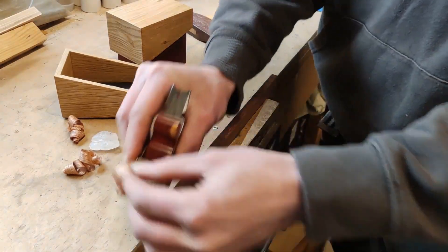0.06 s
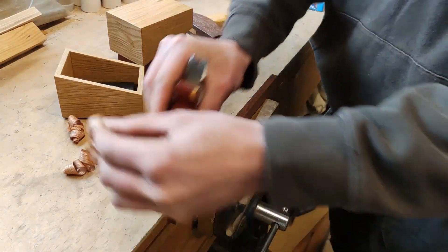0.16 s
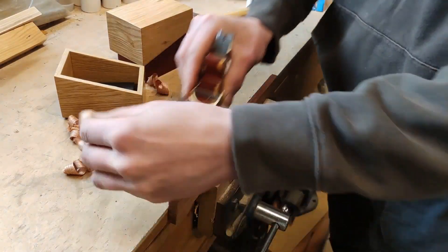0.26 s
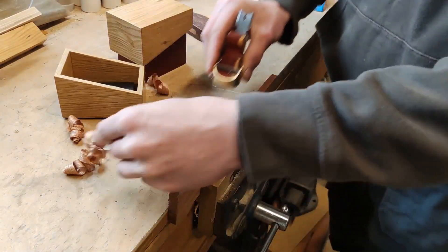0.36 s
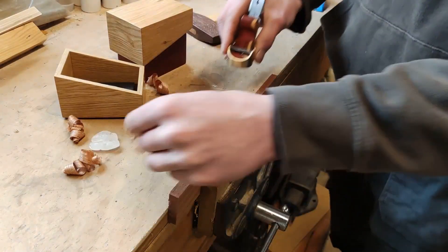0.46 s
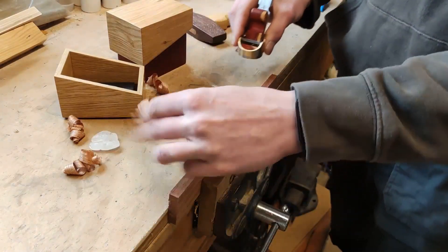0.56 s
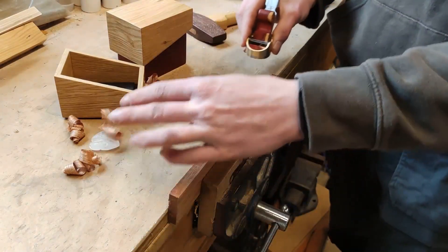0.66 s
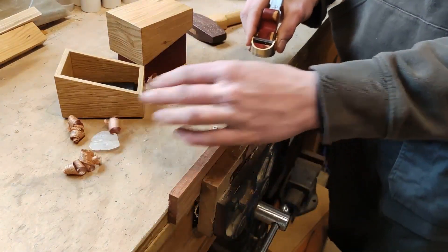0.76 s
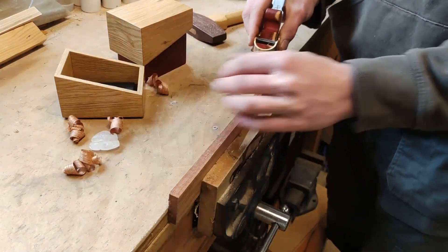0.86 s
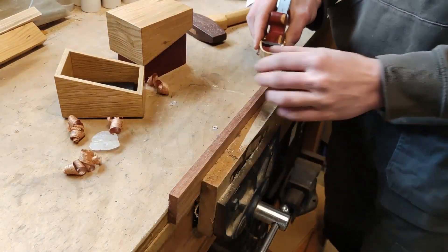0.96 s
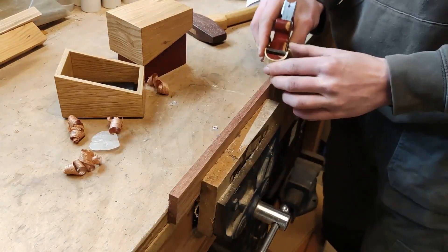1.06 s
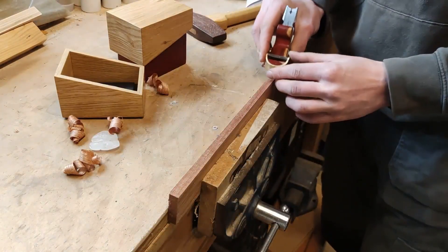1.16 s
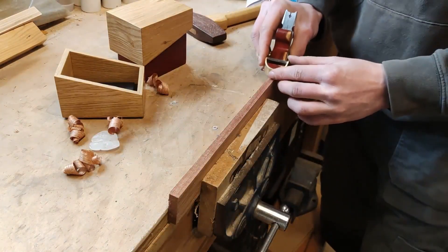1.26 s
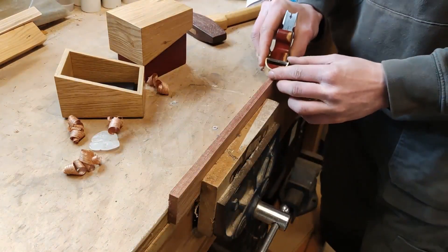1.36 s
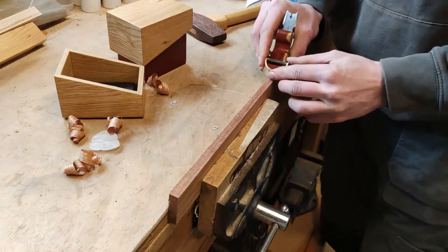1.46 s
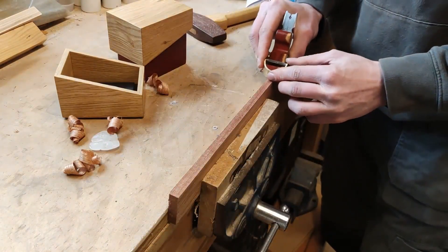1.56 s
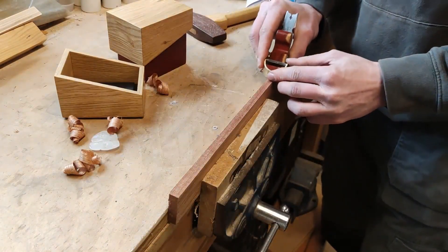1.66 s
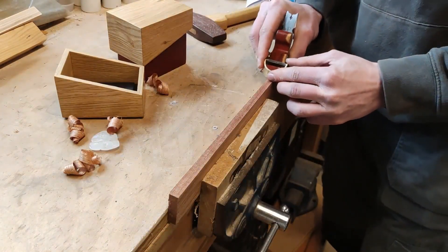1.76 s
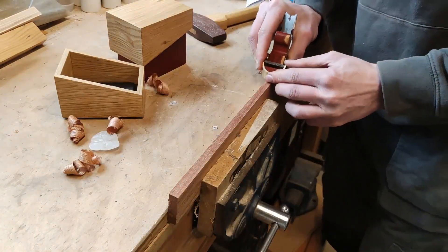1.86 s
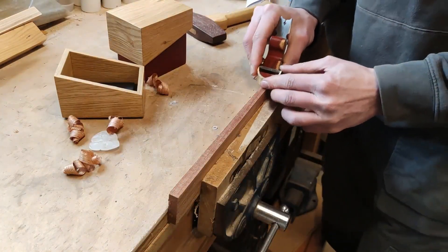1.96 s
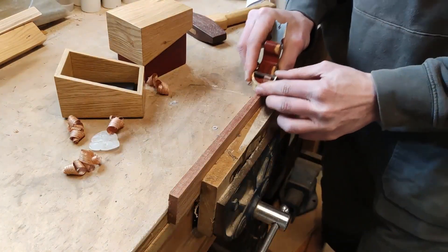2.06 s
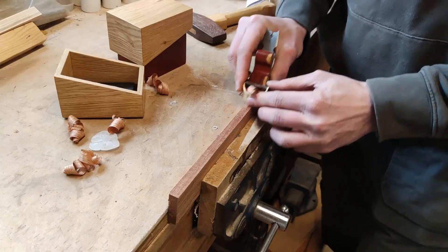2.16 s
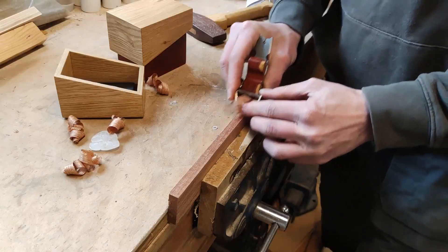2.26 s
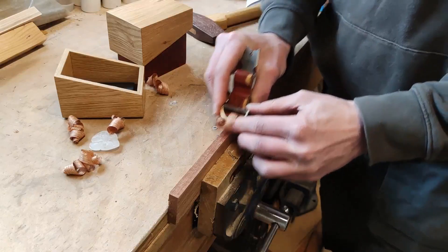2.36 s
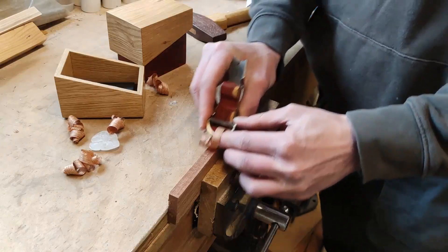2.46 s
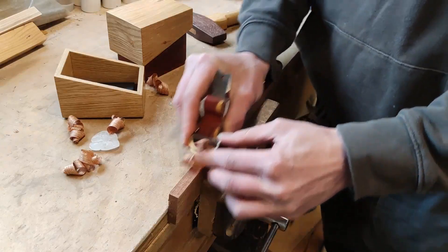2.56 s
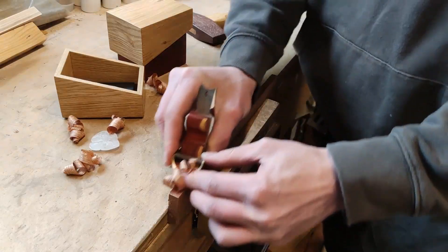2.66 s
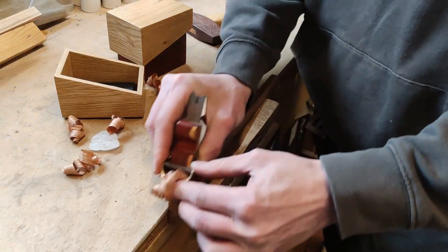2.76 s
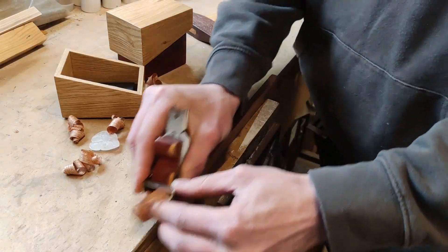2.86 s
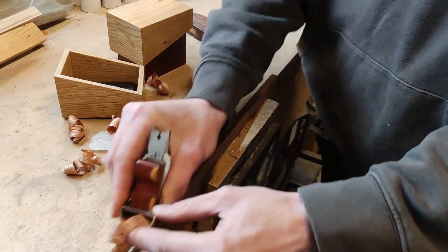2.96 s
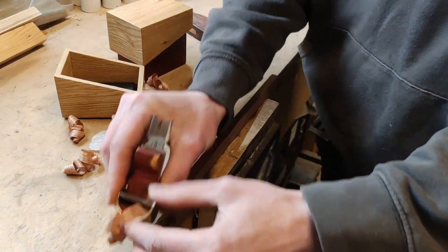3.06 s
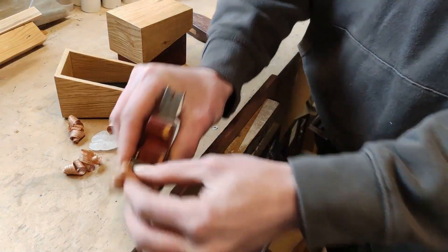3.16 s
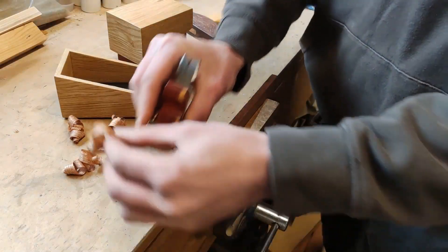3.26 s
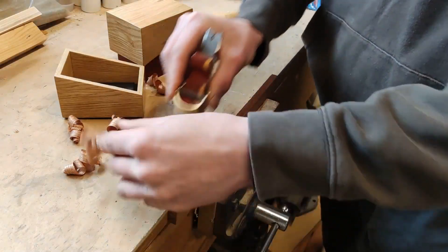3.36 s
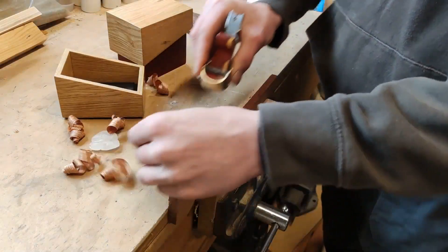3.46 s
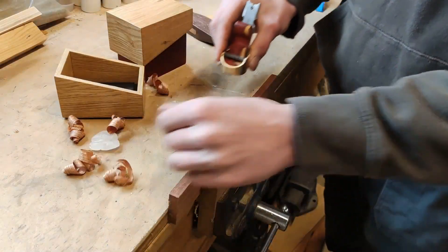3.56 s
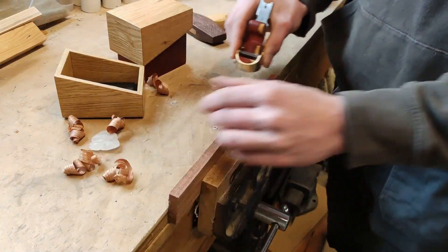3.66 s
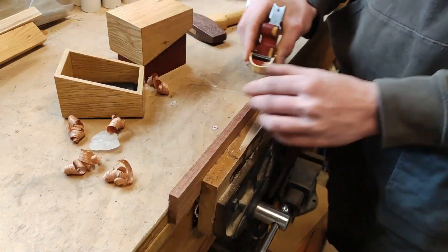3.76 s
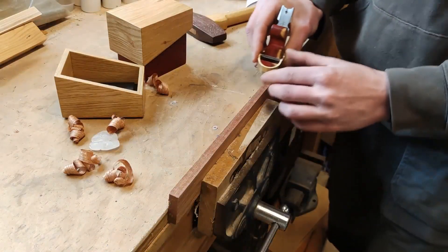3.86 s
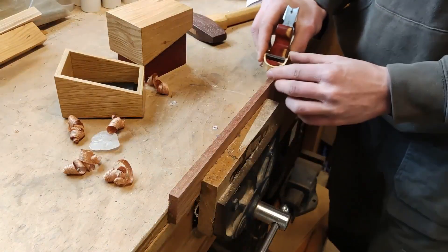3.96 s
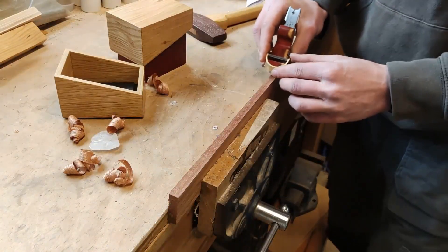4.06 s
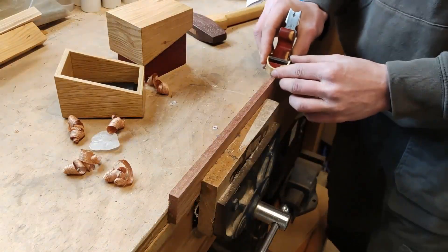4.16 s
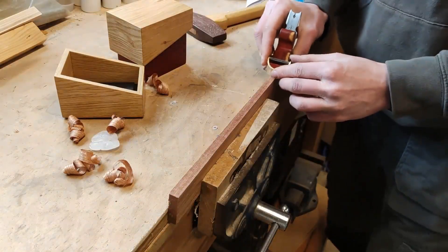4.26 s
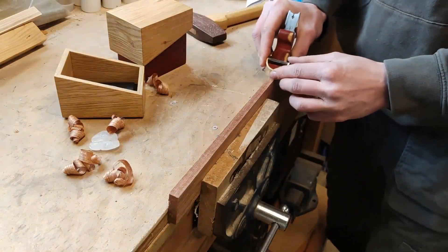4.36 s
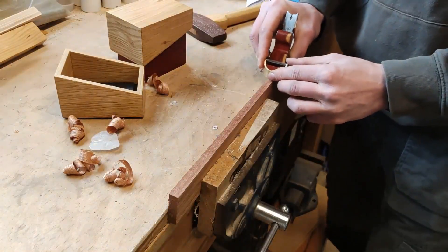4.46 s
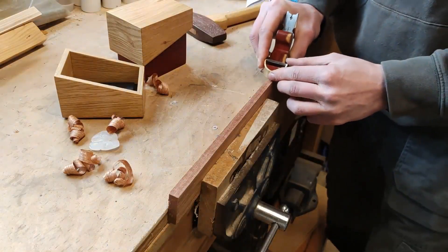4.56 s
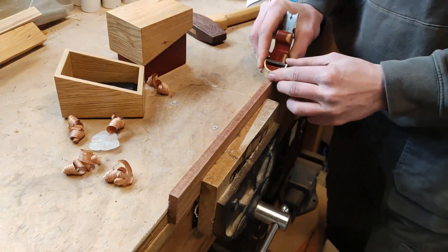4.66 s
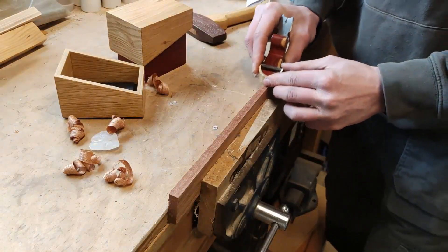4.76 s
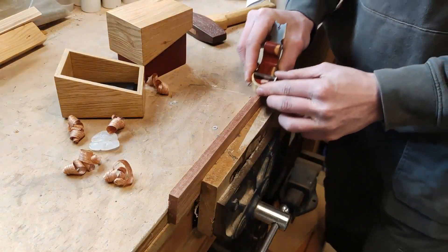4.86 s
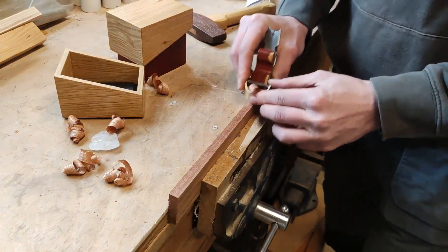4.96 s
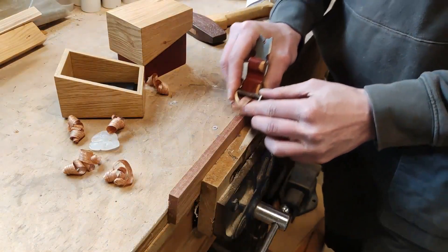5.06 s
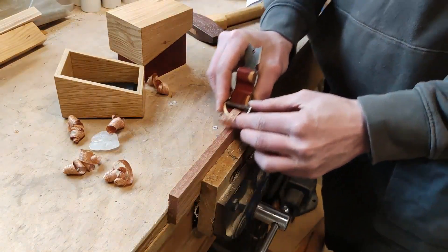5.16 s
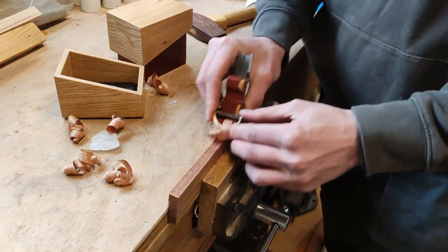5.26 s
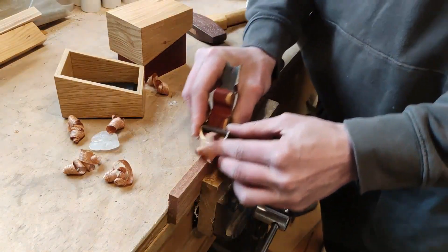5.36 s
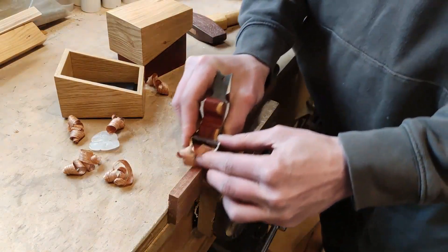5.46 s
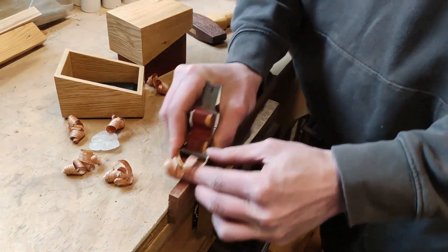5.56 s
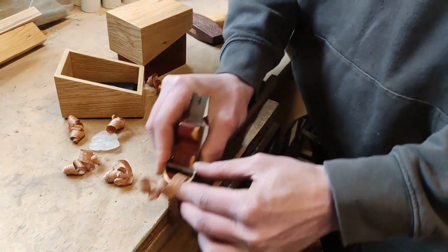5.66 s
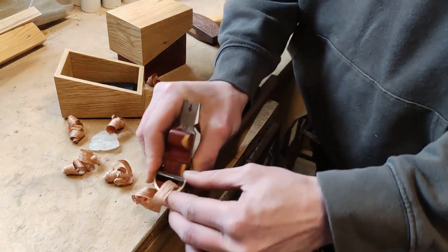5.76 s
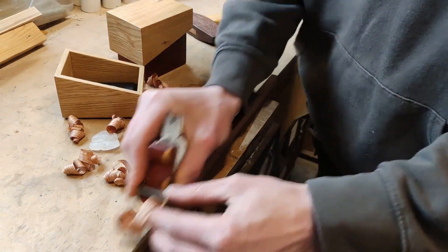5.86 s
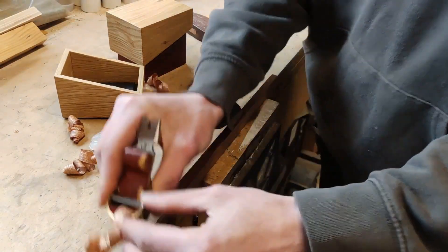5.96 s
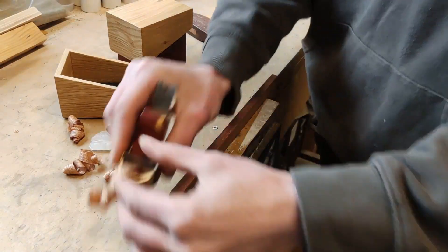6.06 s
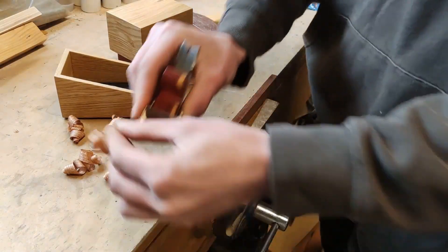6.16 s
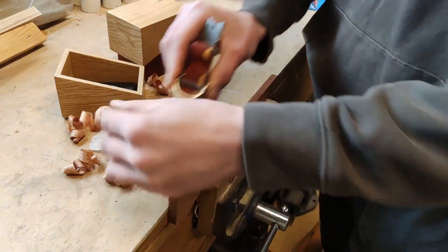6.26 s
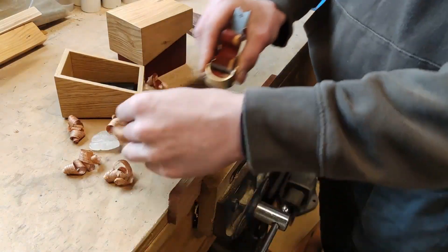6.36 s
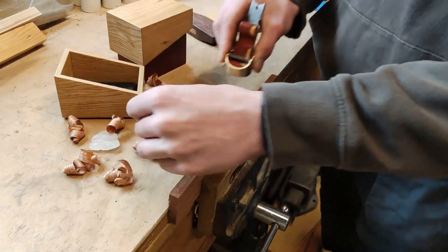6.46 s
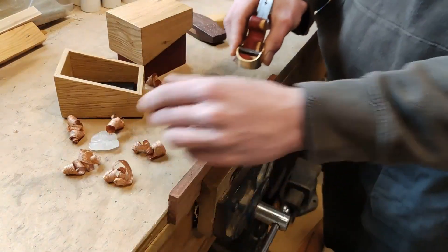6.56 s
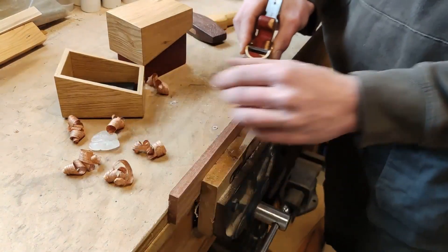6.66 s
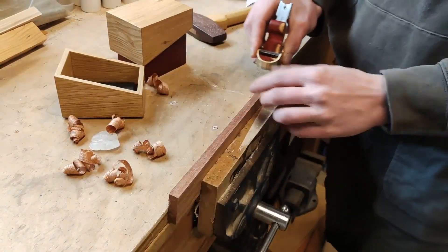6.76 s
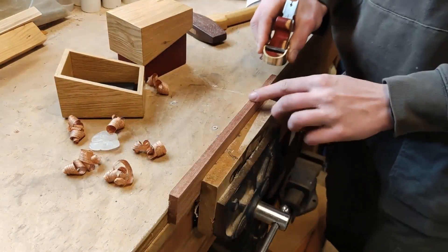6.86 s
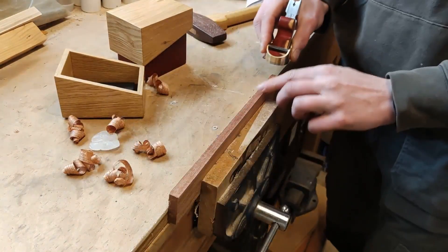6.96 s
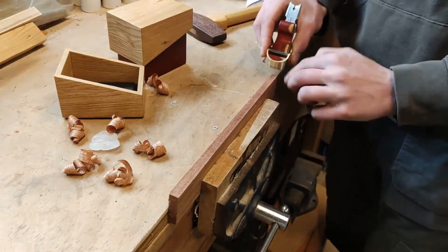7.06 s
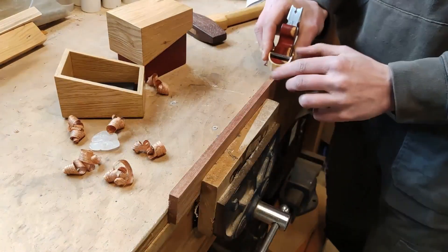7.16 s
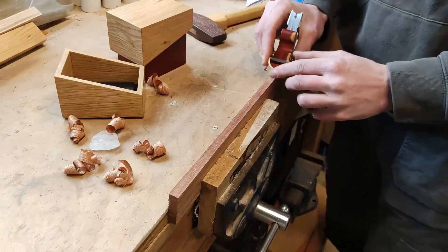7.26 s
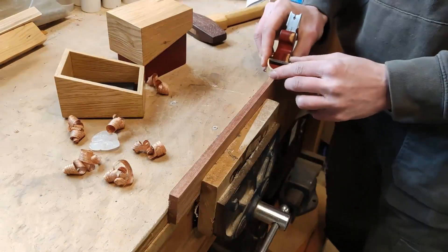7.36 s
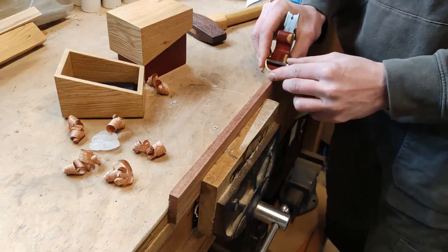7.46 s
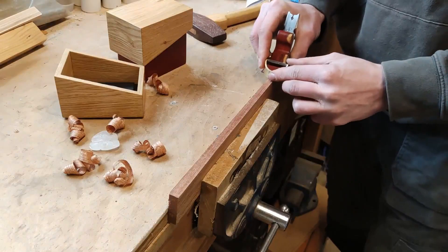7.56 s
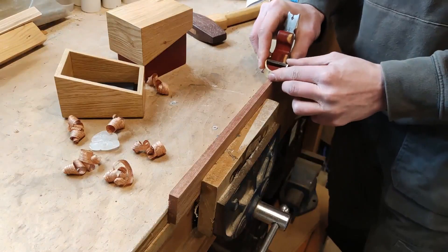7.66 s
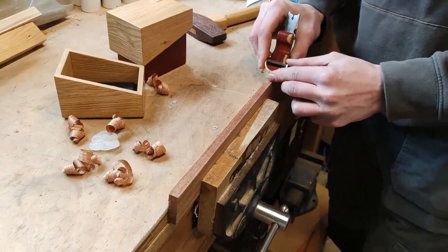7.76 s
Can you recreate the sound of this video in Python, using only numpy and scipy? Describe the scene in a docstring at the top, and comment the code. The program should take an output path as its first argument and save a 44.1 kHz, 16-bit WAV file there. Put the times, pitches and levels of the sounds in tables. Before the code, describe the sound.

Close stereo view of a workbench in a quiet shop. A dry shaving crackles as it is plucked, a car door thuds faintly outside, then the plane taps down and cuts a chattering, hissing stroke of about a second. The curl snaps loose; an engine cranks, flares and idles dimly beyond the wall. A second stroke follows, more crackles, and a firmer wooden knock as the plane is set back.

```python
"""A dry wood curl crackles over still workshop air: bursts, splinter grains and filtered noise.
Outside, faintly, a car door shuts (ringing modes); later an engine cranks, flares and idles (firing-rate sines).
A small brass hand plane is set on a clamped board (struck modes, short patters) and slides lightly (noise).
It takes two shavings: stick-slip chatter, with rasp and hiss built from tiny fractures.
After each stroke the curl is plucked out, and the plane is set back on the board."""
import sys
import numpy as np
from scipy import signal
from scipy.fft import rfft, irfft, next_fast_len
from scipy.io import wavfile
from scipy.ndimage import uniform_filter1d

SR = 44100
rng = np.random.default_rng(int(sys.argv[2]) if len(sys.argv) > 2 else 0)


def master_out(mix):
    """Clip the mix to full scale and print it as 16-bit PCM to the path in sys.argv[1]."""
    frames = np.transpose(np.atleast_2d(mix))
    ceiling = np.clip(frames, -1, 1)
    pcm = np.round(ceiling * 32767).astype(np.int16)
    wavfile.write(sys.argv[1], SR, pcm)


N = 343980
TIME = np.arange(N) / SR
PADDED = next_fast_len(N + SR // 2, True)
BINS_HZ = np.maximum(np.arange(PADDED // 2 + 1) * SR / PADDED, 1)

# Spectrum of the still air: (frequency [Hz], relative density [dB per Hz])
AIR_COLOUR = [(12, -40), (20, 2), (59, -8.5), (98, -18.5), (175, -13.5), (274, -16.5), (360, -20),
              (581, -21), (932, -24), (1700, -27.5), (11700, -33.5), (15500, -34.5)]
AIR_DB = -61

# Left-right correlation of spread sound: (frequency [Hz], correlation)
STEREO_CORRELATION = [(150, 0.75), (300, 0.42), (550, 0.47), (1000, 0), (2000, 0), (15000, 0.0001)]
# Microphone ports: (frequency [Hz], left minus right [dB]); (frequency [Hz], right port lead [rad])
PORT_TILT = [(300, -0.5), (420, 2.8), (550, -2.5), (750, 1), (1050, 0), (1350, 0.5), (1800, -0.5),
             (2200, 1), (3300, -0.5), (4700, 0), (6600, -1.5), (7600, -2.5), (8500, 6.5), (10300, 0),
             (15000, -2)]
PORT_LEAD = [(40, 0), (200, -0.38), (330, -0.02), (640, -0.81), (850, -0.069), (1300, -0.99), (2000, 1.3),
             (4000, -1.64)]
CUTOFF_HZ = 15900

# Cracks of the shaving as the blade enters the wood and as the curl is pulled out and dropped:
# (time [s], relative level [dB])
SHAVING_CRACKS = [(0.1747, -38), (0.2535, -32), (0.2582, -23.5), (0.264, -31.5), (0.2735, -22.5),
                  (.277, -40), (0.601, -43), (0.809, -46), (0.833, -40.5), (1.958, -42), (2.014, -30),
                  (3.268, -38), (3.2971, -28.5), (3.3042, -31), (3.3072, -22), (3.3315, -36.5),
                  (3.392, -46), (3.3982, -29.5), (3.5462, -37.5), (3.591, -44), (4.803, -42), (4.83, -40),
                  (4.864, -33), (6.1464, -40), (6.1639, -38.5), (6.221, -45), (6.229, -43), (6.251, -40),
                  (6.2532, -32), (6.257, -34), (6.2635, -30.5), (6.267, -30), (6.276, -35), (6.3113, -28.5),
                  (6.4083, -40)]
# Crack filter: (frequency [Hz], gain [dB])
CRACK_COLOUR = [(300, -12), (1500, -10.5), (3100, -18.5), (4700, 2), (7600, 10), (10500, -1), (15500, -6.5)]
# Splinter and crinkle spectrum: (frequency [Hz], relative density [dB per Hz])
CURL_COLOUR = [(300, -40), (800, -20), (2000, -18), (3400, -13), (4800, -9), (7200, 3), (8800, -2),
               (10500, -7), (15500, -11)]
# Crinkle as fingers draw, free and drop the curl: (peak time [s], relative level [dB], 1/e half length [s])
CRINKLES = [(.05, -65, 0.052), (.15, -58, 0.048), (.268, -58, 0.022), (.48, -70, 0.1), (.61, -57, 0.014),
            (.68, -68, 0.046), (.84, -64.5, 0.027), (3.12, -69, 0.16), (3.325, -51.5, 0.051),
            (3.40, -54.5, 0.017), (3.48, -60, 0.023), (3.58, -68.5, 0.13), (6.07, -65, 0.051),
            (6.19, -60, 0.046), (6.268, -39, 0.012), (6.316, -48, 0.012), (6.42, -59.5, 0.051),
            (6.53, -67, 0.099)]
# Curl rubs through the plane mouth: (peak time [s], level [dB], 1/e half length [s])
CURL_DRAWS = [(.215, -49, 0.021), (.237, -47, 0.018), (3.335, -57, 0.033), (6.205, -50.5, 0.022)]
# Its spectrum: (frequency [Hz], relative density [dB per Hz])
DRAW_COLOUR = [(3200, -24), (5000, -11), (8000, -4.5), (11000, -7), (12500, -13), (15000, -5)]
# Curl tears loose and scuffs the mouth: (peak time [s], level [dB], 1/e half length [s])
CURL_TUGS = [(.271, -58.5, 0.02), (3.398, -56.5, 0.0046), (6.278, -60, 0.015)]
SPLINTER_SPREAD_DB = 5

# Car door modes: (frequency [Hz], relative level [dB], t60 [s])
DOOR_MODES = [(27.8, -38.5, 0.7), (75.6, -52, 0.38), (139.5, -57.5, 0.71), (192, -38, 0.16),
              (222, -56, 0.41)]
DOOR_S = 0.619
# Engine through the wall: (frequency [Hz], gain [dB])
WALL_GAIN = [(30, 1), (55, -1.5), (66, -19), (88, -9), (110, -11), (160, 3), (230, -3.5)]
# Multiples 1-7 of the firing rate: (relative level [dB])
ENGINE_ORDERS_DB = [-0.5, -3.5, -10, -17, -25, -26.5, -36]
CRANK_FROM_S, CATCH_S, FLARE_S, FLARE_HOLD_S, SETTLE_S = 3.544, 3.76, 0.18, 0.14, 0.74
IDLE_HZ, FLARE_HZ = 27.76, 54.8  # firings per second
ENGINE_DB, STARTER_DB = -49.5, 8.5  # caught engine; extra while cranking
EASES_AT_S, EASE_S, EASE_DB = 5.555, 1, -9.5  # runs more quietly once settled

# Plane set on the board: (time [s], relative level [dB], contact hardness [Hz], relative first crack [dB])
KNOCKS = [(1.3707, -38.5, 580, -36), (1.699, -61.5, 1500, -38), (4.321, -41, 1100, -50),
          (4.572, -42, 800, -56), (6.961, -58.5, 2500, -65), (7.4155, -27, 1410, -20),
          (7.6025, -43, 790, -64)]
# Board and bench modes: (frequency [Hz], relative level [dB], t60 [s])
BOARD_MODES = [(149, -7.5, 0.27), (239, -2, 0.21), (318, 0, 0.13), (389, -3.5, 0.17), (481, 4, 0.088),
               (533, 1.5, 0.11), (579, 2.5, 0.086), (620, 11, 0.021), (822, 9, 0.082), (905, 1.5, 0.03),
               (1017, -3, 0.065), (1190, 2.5, 0.056), (1630, 1, 0.021), (2230, 1.5, 0.025)]
# Many short modes stirred by a landing: (frequency [Hz], gain [dB])
CLACK_COLOUR = [(100, -20), (240, 18), (520, 13), (750, 9), (1050, 10), (1300, -3), (1700, -14),
                (2200, -17), (4500, -4), (15000, -43)]

# Sole and fingertips on wood: (start [s], peak [s], end [s], relative level [dB], pressure on the edge [0-1])
SLIDES = [(1.88, 1.94, 1.97, -61, .15), (3.05, 3.075, 3.11, -56, .2), (4.315, 4.335, 4.41, -58, .2),
          (4.44, 4.55, 4.62, -58, .02), (5.99, 6.035, 6.055, -50, .3), (6.93, 6.97, 7.0, -63, .3),
          (7.02, 7.11, 7.2, -54, .6), (7.13, 7.175, 7.21, -55.5, 1.0), (7.47, 7.57, 7.62, -57, .03)]
# Light rubbing spectrum: (frequency [Hz], relative density [dB per Hz])
SLIDE_COLOUR = [(400, -37), (1000, 3), (1800, -3.5), (3200, -0.5), (6000, -7), (9000, -25), (15000, -42)]
# Plane iron excited by rubbing: (frequency [Hz], width [Hz], gain [dB])
IRON_MODES = [(5920, 300, 5), (8220, 420, 20.5)]

# Cuts: (blade enters [s], blade leaves [s])
STROKES = [(1.94, 2.975), (4.789, 5.97)]
ATTACK_S, RELEASE_DB_PER_S = 0.033, 181
# Surges of the pushing hand: (time [s], slip rate [Hz], nominal chatter level [dB])
FIRST_PUSH = [(1.96, 278, -45), (2.0, 334, -38), (2.05, 590, -31.5), (2.09, 540, -35), (2.13, 310, -33.5),
              (2.17, 554, -35.5), (2.21, 810, -32), (2.228, 1190, -30.5), (2.255, 1140, -32.5),
              (2.275, 825, -27), (2.297, 745, -29.5), (2.33, 500, -32), (2.365, 714, -31),
              (2.405, 1080, -29), (2.45, 1060, -34), (2.49, 1480, -33), (2.53, 1230, -33), (2.57, 890, -33),
              (2.63, 980, -34.5), (2.68, 1070, -40.5), (2.73, 1230, -60), (2.77, 970, -42), (2.8, 580, -32),
              (2.84, 513, -28.5), (2.9, 510, -28), (2.95, 505, -44.5)]
SECOND_PUSH = [(4.809, 254.8, -49), (4.845, 399.4, -35), (4.87, 742, -36.5), (4.936, 844, -28.5),
               (5.01, 896, -30), (5.04, 826, -33.5), (5.064, 721.7, -29), (5.1, 682, -30), (5.14, 784, -30),
               (5.19, 946.6, -29.5), (5.24, 954.5, -30.5), (5.306, 849.5, -29.5), (5.339, 689, -31.5),
               (5.372, 609, -30.5), (5.41, 889.4, -29.5), (5.451, 1238, -34), (5.51, 947.5, -34.5),
               (5.55, 680.5, -36), (5.595, 599, -28), (5.645, 620.7, -30.5), (5.709, 591, -29.5),
               (5.78, 538, -34), (5.825, 520, -32), (5.87, 498.2, -37), (5.902, 261.6, -35.5),
               (5.95, 231.4, -52)]
# Treble of each cut, reference for rasp and hiss: (time [s], level [dB])
FIRST_TREBLE = [(1.96, -55), (2.03, -43), (2.064, -42), (2.15, -48.5), (2.198, -43), (2.248, -39),
                (2.322, -46), (2.464, -37), (2.638, -42), (2.732, -33.5), (2.834, -44.5), (2.91, -44),
                (2.948, -49.5), (2.98, -46.5)]
SECOND_TREBLE = [(4.81, -53.5), (4.868, -45), (5.004, -39), (5.042, -44), (5.228, -39), (5.37, -44.5),
                 (5.436, -38), (5.492, -41.5), (5.59, -46), (5.76, -38), (5.807, -43), (5.854, -42.5),
                 (5.925, -57), (5.94, -52)]
# Blade bites and judders: (peak time [s], chatter level change [dB], 1/e half length [s])
BITES = [(2.295, 2.5, 0.0053), (2.862, -8, 0.0057), (2.879, 5.5, 0.011), (2.9, -7, 0.0023),
         (2.916, -4, 0.0022), (2.922, 7, .003), (5.581, -5, 0.0063), (5.59, 3.5, 0.0066), (5.894, -3, .012)]
# Chatter turns cleaner and more tonal near the board's end, its pitch still gliding:
# (peak time [s], 1/e half length [s], share of roughness lost [0-1])
TONAL_SPELLS = [(2.867, 0.0597, 0.65), (5.714, 0.17, 0.3)]
# Fibres tear out: (peak time [s], rasp level [dB], hiss level [dB], 1/e half length [s])
TEARS = [(2.244, -36, -82, 0.075), (2.954, -39, -36, 0.026), (5.965, -49, -43.5, 0.0071)]
# Blade catches or runs off, bench shakes: (peak time [s], level [dB], 1/e half length [s])
SHUDDERS = [(2.034, -51, 0.0099), (2.09, -50.5, 0.027), (2.997, -44.5, 0.019), (3.09, -57, 0.035),
            (5.903, -44, 0.027), (5.97, -44, 0.026)]
# Coarse grain: (peak time [s], low resonance [dB], high resonance [dB], 1/e half length [s])
BOOMS = [(2.357, -41, -38, 0.02), (2.44, -51, -36.5, 0.036), (2.563, -56, -37.5, 0.023),
         (2.636, -56, -37.5, 0.045), (4.947, -41.5, -34.5, 0.017), (5.146, -52, -34.5, 0.027),
         (5.22, -72, -35.5, 0.031), (5.35, -49, -53, 0.024), (5.417, -71, -34.5, 0.021),
         (5.49, -54, -36, 0.031), (5.909, -36, -39, 0.018)]
# Chatter through the board: (frequency [Hz], gain [dB])
BOARD_COLOUR = [(140, -11.5), (255, 3), (400, -0.5), (560, 6), (700, 0), (860, 4), (1050, -8.5), (1300, -5),
                (1650, -5), (2100, -10.5), (2500, 1.5), (3300, -18), (8000, -33)]
# Fibre crack filter: (frequency [Hz], gain [dB])
RASP_COLOUR = [(200, -10.5), (400, 7), (560, 10.5), (850, 1), (1000, 4), (1400, -2.5), (1600, 3),
               (1900, 2.5), (2400, -5), (2900, -5.5), (3800, -4), (5000, -14), (9000, -21)]
# Shaving and dust spectrum: (frequency [Hz], relative density [dB per Hz])
HISS_COLOUR = [(1500, -24.5), (3000, 1.5), (4500, 0), (5500, 2), (6800, 2), (7500, -3), (8400, 0),
               (9900, -2.5), (10500, -6.5), (13000, -6), (15500, -8.5)]
# Bench shake spectrum: (frequency [Hz], relative density [dB per Hz])
RUMBLE_COLOUR = [(50, -28), (100, -36), (145, 12.5), (195, -21), (245, -1), (330, -6), (600, -69)]
# Plane body and iron modes in the cut: (frequency [Hz], width [Hz], gain [dB])
PLANE_MODES = [(1160, 200, -8.5), (1870, 39, -5.5), (1990, 72, -14.5), (2260, 23, -0.5), (2636, 32, 9)]
USUAL_SLIPS_HZ = 700
# Rasp and hiss relative to the treble level; rasp change per octave of slip rate
RASP_DB, HISS_DB, RASP_DB_PER_OCTAVE = 2, 3.5, 3
UNDER_DB_PER_OCTAVE, DOUBLE_DB = -7.5, 3  # rasp below the slip rate; at twice the slip rate
RUMBLE_DB, RUMBLE_DB_PER_OCTAVE = -60, -6.5  # at the usual slip rate
CHATTER_DB = -0.1
ROUGHNESS, WANDER = 0.62, 0.25  # roughness 0-1; log rate spread at roughness 1
OCTAVE_DB, OCTAVE_DB_PER_OCTAVE = -12.5, 5  # relative to chatter at the usual slip rate
TWELFTH_DB = -7  # before its tonality-dependent gain


def from_db(db):
    """Amplitude ratio of a level in dB."""
    return 10 ** (np.asarray(db) / 20)


def rms_one(x):
    """Scale to rms 1 over all channels."""
    return x / np.sqrt(np.mean(x ** 2) + 1e-20)


def in_time(rows):
    """Interpolate each column after the first over time."""
    s, *columns = np.transpose(rows)
    return [np.interp(TIME, s, column) for column in columns]


def over_bins(points):
    """Interpolate (Hz, value) rows over log frequency."""
    hz, value = np.transpose(points)
    return np.interp(np.log(BINS_HZ), np.log(hz), value)


def colour(x, points):
    """Causal minimum-phase filter with the given (Hz, dB) response."""
    cepstrum = irfft(np.log(from_db(over_bins(points))), PADDED)
    cepstrum[1:PADDED // 2] *= 2
    cepstrum[PADDED // 2 + 1:] = 0
    response = np.exp(rfft(cepstrum))
    return irfft(rfft(x, PADDED) * response, PADDED)[..., :N]


def lowpass(x, hz):
    """Second-order Butterworth low-pass."""
    return signal.sosfilt(signal.butter(2, hz, fs=SR, output="sos"), x)


def resonate(x, modes):
    """Sum of band-pass resonances given as (Hz, width Hz, dB)."""
    return sum(from_db(db) * signal.lfilter(*signal.iirpeak(hz, hz / width, fs=SR), x)
               for hz, width, db in modes)


def spread(pair):
    """Two unrelated signals become left and right, alike in the bass and unlike in the treble."""
    alike = over_bins(STEREO_CORRELATION)
    mid, side = rfft(pair, PADDED) * np.sqrt([1 + alike, 1 - alike])
    return irfft([mid + side, mid - side], PADDED)[:, :N]


def drift(rate_hz):
    """Smooth random signal of rms 1: white noise through a double pole."""
    r = np.exp(-2 * np.pi * rate_hz / SR)
    white = rng.standard_normal(N + SR)
    return rms_one(signal.lfilter([1], [1, -2 * r, r * r], white)[SR:])


def ring(x, hz, t60_s):
    """Two-pole resonator: a unit click starts a decaying sine of height 1."""
    r, w = from_db(-60 / (t60_s * SR)), 2 * np.pi * hz / SR
    return signal.lfilter([0, np.sin(w)], [1, -2 * r * np.cos(w), r * r], x + 1e-18)


def swell(s, length_s):
    """Gaussian rise to 1 at time s and an equal fall."""
    return np.exp(-np.minimum(((TIME - s) / length_s) ** 2, 50))


def swells(rows):
    """Summed gain of (time s, dB, 1/e half length s) rows."""
    return sum(from_db(db) * swell(s, length_s) for s, db, length_s in rows)


def ramp(start_s, length_s):
    """Goes from 0 to 1, then stays."""
    return np.clip((TIME - start_s) / length_s, 0, 1)


def noise(points):
    """Coloured stereo noise, rms 1."""
    return rms_one(colour(spread(rng.standard_normal((2, N))), points))


def workshop(x, near_db, near_t60_s, far_db, far_t60_s):
    """Direct sound, quick scatter from hands and tools, and the short tail of the room."""
    t = TIME[:SR // 2]
    scatter = spread(rng.standard_normal((2, N)))[:, :len(t)]
    response = np.zeros_like(scatter)
    response[:, 0] = 1
    # small things scatter only the short waves
    for level_db, t60_s, lowest_hz in ((near_db, near_t60_s, 900), (far_db, far_t60_s, 200)):
        decay = np.exp(-np.log(1000) * t / t60_s)
        onset = 1 - np.exp(-(20 * t / t60_s) ** 2)
        highpass = signal.butter(2, lowest_hz, "high", fs=SR, output="sos")
        tail = signal.sosfilt(highpass, scatter * decay * onset)
        response += from_db(level_db) * rms_one(tail) / np.sqrt(len(t))
    return signal.fftconvolve(np.atleast_2d(x), response, axes=1)[:, :N]


def fractures(per_s, size_db):
    """Tiny cracks at random moments, of uneven size and random sign."""
    born = rng.random(N) < per_s / SR
    size = from_db(size_db * np.minimum(rng.exponential(1, N), 5))
    return born * size * rng.choice([-1, 1], N)


def grains(points, per_s, size_db):
    """Coloured fractures spread in stereo, rms 1."""
    pair = [fractures(per_s, size_db), fractures(per_s, size_db)]
    return rms_one(colour(spread(pair), points))


def burst(decay_s):
    """A dying noise patter of tiny contacts, always of energy 1."""
    t = TIME[:SR // 5]
    patter = rng.standard_normal(len(t)) * np.exp(-t / decay_s)
    return patter / np.sqrt(np.sum(patter ** 2))


def air():
    """Still air of the shop: steady coloured noise."""
    return from_db(AIR_DB) * noise(AIR_COLOUR)


def curl(snap_db=9.5, snap_s=0.00059, splinter_db=-24, splinter_s=0.0038, crinkle_db=3.0):
    """Sub-millisecond cracks in the dry shaving spray splinters, over a finer crinkle and rubbing."""
    split, spray = np.zeros((2, N)), np.zeros(N)
    t = TIME[:SR // 5]
    for s, db in SHAVING_CRACKS:
        at = round(s * SR)
        split[:, at:at + len(t)] += from_db(db) * np.array([burst(snap_s), burst(snap_s)])
        spray[at:at + len(t)] += from_db(db) * np.exp(-t / splinter_s)
    cracks = from_db(snap_db) * colour(spread(split), CRACK_COLOUR)
    splinters = spray * grains(CURL_COLOUR, per_s=820, size_db=SPLINTER_SPREAD_DB)
    crinkle = swells(CRINKLES) * grains(CURL_COLOUR, per_s=1800, size_db=4.5)
    rubbing = swells(CURL_DRAWS) * noise(DRAW_COLOUR) + swells(CURL_TUGS) * noise(SLIDE_COLOUR)
    close = cracks + from_db(splinter_db) * splinters + from_db(crinkle_db) * crinkle + rubbing
    return workshop(close, near_db=-8, near_t60_s=0.026, far_db=-10, far_t60_s=0.16)


def car_door(door_db=-4.5, latch_s=0.0273, latch_db=-1.5):
    """Thud and latch are two clicks that ring the door modes; the wall passes only the bass."""
    shut = np.zeros(N)
    shut[round(DOOR_S * SR)] = from_db(door_db)
    shut[round((DOOR_S + latch_s) * SR)] = from_db(door_db + latch_db)
    thud = sum((-1) ** k * ring(from_db(db) * shut, hz, t60_s)
               for k, (hz, db, t60_s) in enumerate(DOOR_MODES))
    return lowpass(thud, 300)


def engine_run(spin_up_s=0.26):
    """Firing rate and gain of the engine from cranking through flare to idle."""
    caught = ramp(CATCH_S, FLARE_S)
    since_flare_s = np.maximum(TIME - CATCH_S - FLARE_S - FLARE_HOLD_S, 0)
    flare = caught * np.exp(-since_flare_s / SETTLE_S)
    level_db = ENGINE_DB + STARTER_DB * (1 - caught) + EASE_DB * ramp(EASES_AT_S, EASE_S)
    firings_hz = IDLE_HZ + (FLARE_HZ - IDLE_HZ) * flare
    return firings_hz, ramp(CRANK_FROM_S, spin_up_s) * from_db(level_db)


def car_engine(uneven_db=-1.0):
    """Multiples of the firing rate, each of drifting level, heard through the wall."""
    firings_hz, gain = engine_run()
    phase = 2 * np.pi * np.cumsum(firings_hz) / SR
    orders = sum(from_db(db + uneven_db * drift(3)) * np.sin(k * phase)
                 for k, db in enumerate(ENGINE_ORDERS_DB, 1))
    return colour(gain * orders, WALL_GAIN)


def knocks(ring_db=-10, clack_db=8, clack_s=0.0062, settle_s=0.00199, toe_db=-3,
           crack_db=6, crack_s=0.00056, crack_hz=5000):
    """The toe lands with a crack, then the whole sole; a softer landing stirs only the low modes."""
    force, clack, crack = np.zeros((3, N))
    for s, db, hard_hz, first_db in KNOCKS:
        toe, sole = np.zeros((2, N))
        toe[round(s * SR)] = 1
        sole[round((s + settle_s) * SR)] = 1
        pole = np.exp(-2 * np.pi * hard_hz / SR)
        landing = from_db(db) * (from_db(toe_db) * toe + sole)
        push = signal.lfilter([1 - pole], [1, -pole], landing + 1e-18)
        force += push
        # every landing hits another spot and stirs the short modes in its own way
        clack += signal.oaconvolve(push, burst(clack_s))[:N]
        crack += from_db(first_db) * signal.oaconvolve(toe, burst(crack_s))[:N]
    modes = sum((-1) ** k * from_db(db + ring_db) * ring(force, hz, t60_s)
                for k, (hz, db, t60_s) in enumerate(BOARD_MODES))
    blow = modes + from_db(clack_db) * colour(clack, CLACK_COLOUR)
    blow = blow + from_db(crack_db) * lowpass(crack, crack_hz)
    return workshop(blow, near_db=-5, near_t60_s=0.006, far_db=-7, far_t60_s=0.22)


def slides(board_hz=1020, board_t60_s=0.007, board_db=-16, dust_db=-1, rub_db=-2):
    """Light rubbing swells and stops; a wipe along the edge makes the board sing and sweeps hissing dust."""
    rub = noise(SLIDE_COLOUR) * from_db(rub_db + 1.0 * drift(52.0))
    rub = rub + resonate(rub, IRON_MODES)
    sung = from_db(board_db) * ring(rub, board_hz, board_t60_s)
    dust = from_db(dust_db) * grains(HISS_COLOUR, per_s=20000, size_db=7.5)
    out = 0
    for start_s, top_s, end_s, db, pressure in SLIDES:
        gain = from_db(db) * np.interp(TIME, [start_s, top_s, end_s], [0, 1, 0])
        out = out + gain * (rub + pressure * sung + np.sqrt(pressure) * dust)
    return out


def contact(enters_s, leaves_s):
    """The blade sinks into the wood, stays in, and runs off the end."""
    return ramp(enters_s, ATTACK_S) * from_db(-RELEASE_DB_PER_S * np.clip(TIME - leaves_s, 0, 1))


def chatter(slips_hz, tonal, flutter_db=4.0, second_db=-8, third_db=-17):
    """Stick-slip: an uneven growl in rough grain, cleaner in the tonal spells; steady level."""
    rough = ROUGHNESS * (1 - tonal)
    phase = 2 * np.pi * np.cumsum(slips_hz * np.exp(WANDER * rough * drift(267.6))) / SR
    wave = np.sin(phase)
    wave = wave + from_db(second_db) * rough * np.sin(2 * phase) + from_db(third_db) * np.sin(3 * phase)
    flutter = from_db(flutter_db * np.sqrt(rough) * drift(255))
    wave = colour(wave * flutter, BOARD_COLOUR)
    wave = workshop(wave, near_db=3.0, near_t60_s=0.038, far_db=-2, far_t60_s=0.078)
    power = uniform_filter1d(np.mean(wave ** 2, axis=0), size=1100)
    power = uniform_filter1d(power, size=1100)
    return wave / np.sqrt(power + 1e-12)


def overtone(hz, flutter_hz):
    """A fluttering band that glides with the given pitch; stereo, rms 1."""
    phase = 2 * np.pi * np.cumsum(hz) / SR
    band = drift(flutter_hz) * np.sin(phase) + drift(flutter_hz) * np.cos(phase)
    return rms_one(workshop(band, near_db=7, near_t60_s=0.0068, far_db=-3.5, far_t60_s=0.082))


def blade(slips_hz, chatter_db, uneven_db=1.5):
    """Chatter follows the hand, jumps at bites and turns more tonal in spells; its overtones glide along."""
    bite_db = sum(db * swell(s, length_s) for s, db, length_s in BITES)
    tonal = sum(lost * swell(s, length_s) for s, length_s, lost in TONAL_SPELLS)
    tone_phase = 2 * np.pi * np.cumsum(slips_hz * np.exp(0.04 * drift(60))) / SR
    tone = np.sqrt(2) * np.sin(tone_phase)
    judder = np.sqrt(1 - tonal ** 2) * chatter(slips_hz, tonal) + tonal * tone
    # a faster cut growls more an octave up; the tonal spells whistle at three times the slip rate
    octave_db = OCTAVE_DB + OCTAVE_DB_PER_OCTAVE * np.log2(slips_hz / USUAL_SLIPS_HZ)
    octave = from_db(octave_db) * overtone(2 * slips_hz, flutter_hz=285)
    twelfth_gain = from_db(TWELFTH_DB) * np.sqrt(tonal) * (1 - tonal)
    twelfth = twelfth_gain * overtone(3 * slips_hz, flutter_hz=60)
    level = from_db(chatter_db + CHATTER_DB)
    return level * (from_db(bite_db + uneven_db * drift(32)) * judder + (1 - tonal) * octave + twelfth)


def shifting(x, slips_hz, depth_db, rate_hz):
    """Third-octave bands fade below the slip rate, swell at twice that rate, and come and go with the grain."""
    octaves = np.maximum(np.log2(BINS_HZ / 400), 0)
    slip_octaves = np.log2(slips_hz / 400)
    spectrum = rfft(x, PADDED)
    out = x.copy()
    for k in range(12):
        weight = np.maximum(0, 1 - np.abs(3 * octaves - k))
        band = irfft(spectrum * weight, PADDED)[:, :N]
        above = k / 3 - slip_octaves
        under_db = UNDER_DB_PER_OCTAVE * np.maximum(-above, 0)
        double_db = DOUBLE_DB * np.maximum(0, 1 - 3 * np.abs(above - 1))
        out += band * (from_db(under_db + double_db + depth_db * drift(rate_hz)) - 1)
    return out


def tearing(slips_hz):
    """Fibres part in ragged clumps and ring the plane; hands and bench scatter the sound; stereo."""
    cracks = colour(fractures(per_s=1500, size_db=0.5), RASP_COLOUR)
    body = resonate(cracks, PLANE_MODES)
    scattered = workshop(cracks + body, near_db=3.0, near_t60_s=0.024, far_db=4.5, far_t60_s=0.14)
    clumps = from_db(3.2 * drift(160))
    return shifting(rms_one(scattered * clumps), slips_hz, depth_db=2.8, rate_hz=20)


def shaving(wander_db=8, count=3):
    """Clumps of fine cracks, scattered by moving hands along paths that come and go; stereo, rms 1."""
    cracks = grains(HISS_COLOUR, per_s=7000, size_db=-0.5)
    paths = [workshop(cracks, near_db=4.0, near_t60_s=0.012, far_db=4.5, far_t60_s=0.083)
             for _ in range(count)]
    shares = from_db([wander_db * drift(7.2) for _ in range(count)])
    shares = shares / np.sqrt(np.sum(shares ** 2, axis=0))
    clumps = from_db(2.0 * drift(140))
    return rms_one(clumps * sum(share * path for share, path in zip(shares, paths)))


def booms(low_hz=275, high_hz=530, width=0.32):
    """Coarse grain shakes two low resonances of the board for a moment: band-passed noise."""
    out = 0
    for column, hz in enumerate((low_hz, high_hz), 1):
        edges_hz = hz * np.exp(np.array([-0.5, 0.5]) * width)
        band = signal.butter(2, edges_hz, "band", fs=SR, output="sos")
        gain = swells((row[0], row[column], row[-1]) for row in BOOMS)
        out = out + gain * rms_one(signal.sosfilt(band, rng.standard_normal(N)))
    return out


def strokes():
    """A fast plane rasps through the fibres and its shaving hisses; a slow one shakes the bench."""
    slips_hz, chatter_db = in_time([*FIRST_PUSH, *SECOND_PUSH])
    treble_db, = in_time([*FIRST_TREBLE, *SECOND_TREBLE])
    octaves = np.log2(slips_hz / USUAL_SLIPS_HZ)
    cut = sum(contact(enters_s, leaves_s) for enters_s, leaves_s in STROKES)
    rasp = cut * from_db(treble_db + RASP_DB + RASP_DB_PER_OCTAVE * octaves)
    rasp = rasp + swells((s, db, length_s) for s, db, _, length_s in TEARS)
    hiss = cut * from_db(treble_db + HISS_DB)
    hiss = hiss + swells((s, db, length_s) for s, _, db, length_s in TEARS)
    shake = cut * from_db(RUMBLE_DB + RUMBLE_DB_PER_OCTAVE * octaves) + swells(SHUDDERS)
    grain = from_db(0.11 * drift(69.7))  # the wood resists unevenly
    treble = grain * (rasp * tearing(slips_hz) + hiss * shaving())
    return cut * blade(slips_hz, chatter_db) + treble + shake * noise(RUMBLE_COLOUR) + booms()


def scene():
    """Work at the bench over still air, with the car outside."""
    return air() + curl() + car_door() + car_engine() + knocks() + slides() + strokes()


def record(dry):
    """Each microphone port has its own colour and phase; the top is cut."""
    tilt_db, lead_rad = over_bins(PORT_TILT) / 2, over_bins(PORT_LEAD) / 2
    ports = from_db([tilt_db, -tilt_db]) * np.exp(1j * np.array([-lead_rad, lead_rad]))
    top = 1 / np.sqrt(1 + (BINS_HZ / CUTOFF_HZ) ** 300)
    return irfft(rfft(dry, PADDED) * ports * top, PADDED)[:, :N]


dry = scene()
out = record(dry)
master_out(out)
```